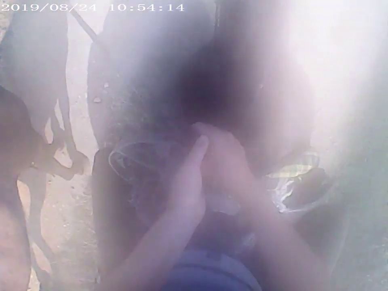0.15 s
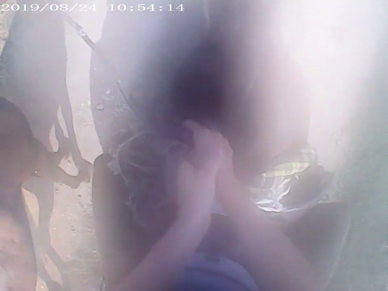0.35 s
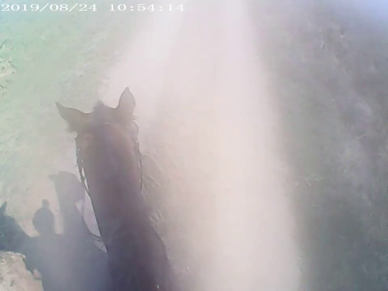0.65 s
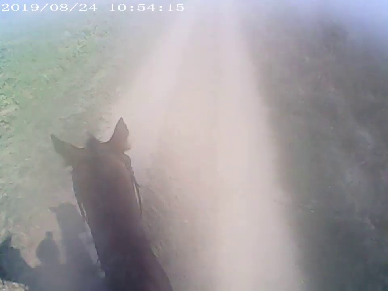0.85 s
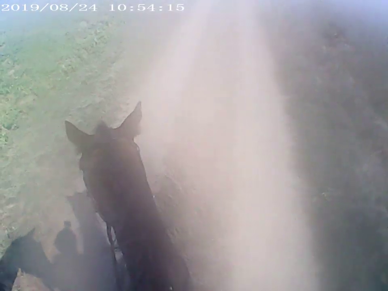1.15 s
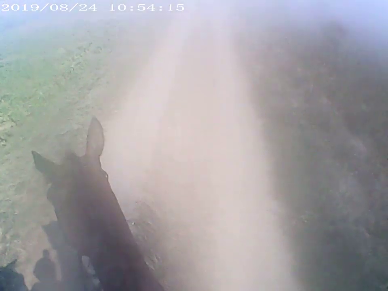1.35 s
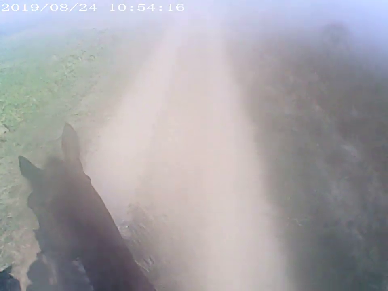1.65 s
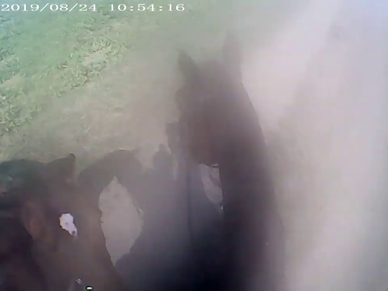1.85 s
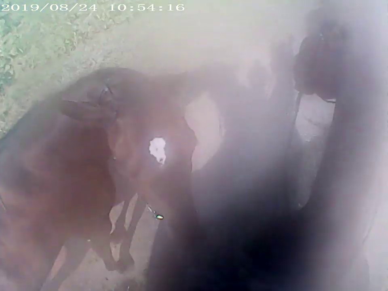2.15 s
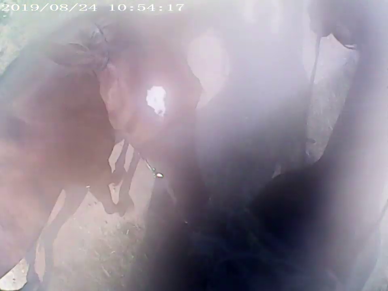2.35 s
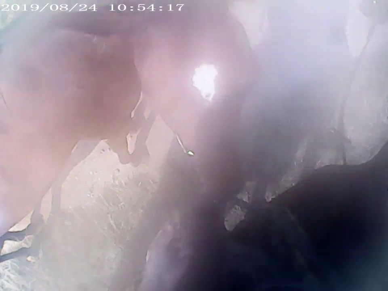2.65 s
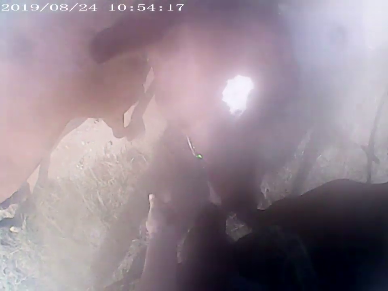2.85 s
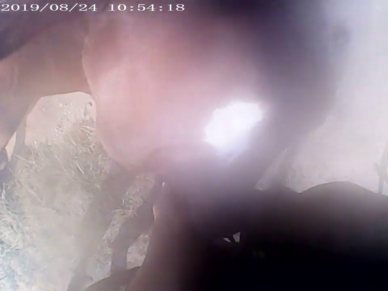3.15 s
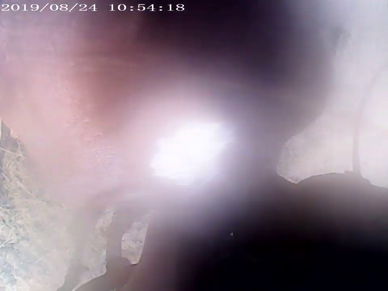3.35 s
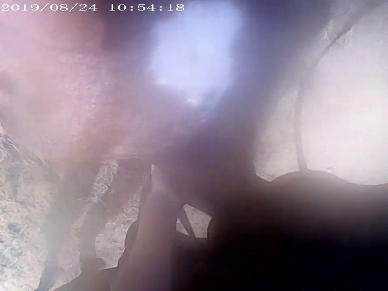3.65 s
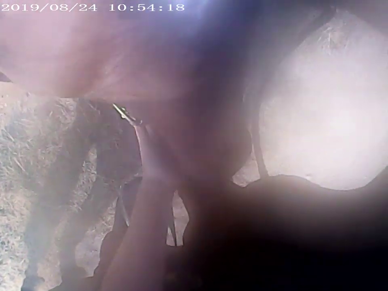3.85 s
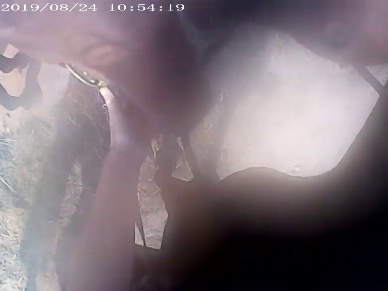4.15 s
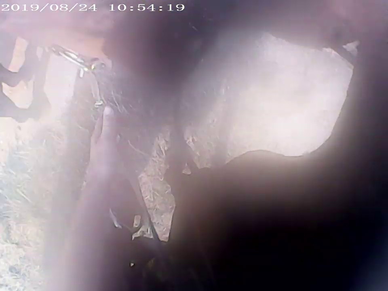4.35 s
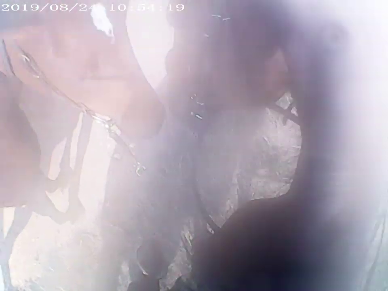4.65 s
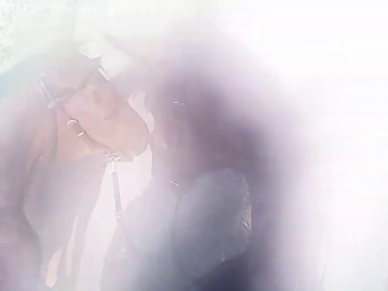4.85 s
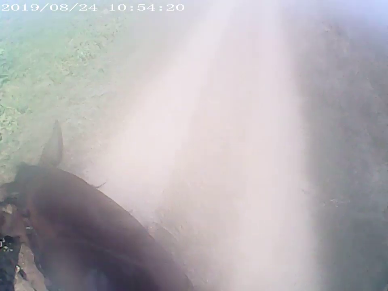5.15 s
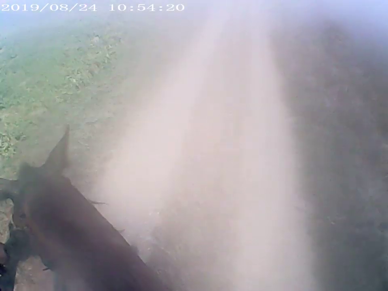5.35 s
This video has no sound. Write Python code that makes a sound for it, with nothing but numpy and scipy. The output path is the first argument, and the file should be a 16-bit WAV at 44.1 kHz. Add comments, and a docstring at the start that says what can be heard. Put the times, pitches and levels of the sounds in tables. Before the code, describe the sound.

Close, irregular handling noise outdoors: soft thumps, hard plastic ticks and grainy strap rubs, densest midway, with a dull rumble and thin hiss.

```python
"""A short rub and a low rumble come first, then a hollow tick and two soft thumps, close on the microphone.
Place: a dirt track, on a trotting horse; the microphone sits in a small camera worn by the rider.
Soft jolts push the membrane, hard contacts ring the plastic shell, and straps stroke it with grainy noise
that rubs, creaks and sizzles. Air rumbles at the port, and the recorder hisses below its narrow band limit."""
import sys
import numpy as np
from scipy import signal
from scipy.fft import rfft, irfft, next_fast_len
from scipy.io import wavfile
from scipy.ndimage import map_coordinates

SR = 44100
rng = np.random.default_rng(int(sys.argv[2]) if len(sys.argv) > 2 else 0)


def materialize(psi):
    """Save the field psi as 16-bit PCM at rate SR to the path in sys.argv[1].

    A 1-D psi becomes a single channel; in a 2-D psi each row is a channel.
    """
    bounded = np.clip(np.atleast_2d(psi).T, -1, 1)
    quanta = np.round(bounded * 32767).astype(np.int16)
    wavfile.write(sys.argv[1], SR, quanta)


N = 242991  # samples, about 5.5 s


def amp(db):
    """Gain of a level in dB."""
    return 10 ** (np.asarray(db) / 20)


def unit(x):
    """x scaled to rms 1."""
    return x / np.sqrt(np.mean(x ** 2) + 1e-20)


def wobble(rate):
    """A smooth random curve with rate knots a second."""
    knots = rng.standard_normal(int(N * rate / SR) + 4)
    return map_coordinates(knots, [np.arange(N) * rate / SR])


def filtered(x, response):
    """x through a filter given as gain against frequency in Hz."""
    size = next_fast_len(N + 8192)
    gain = response(np.fft.rfftfreq(size, 1 / SR))
    return irfft(rfft(x, size) * gain, size)[..., :N]


def coloured(x, spectrum):
    """x shaped by (Hz, dB) points joined on a log frequency axis, then set to rms 1."""
    points_hz, points_db = np.transpose(spectrum)

    def response(hz):
        return amp(np.interp(np.log(hz + 1), np.log(points_hz), points_db))

    return unit(filtered(x, response))


def grainy(spike_db, lump_db, rate):
    """Noise whose single samples and short lumps differ widely in size."""
    spikes = amp(spike_db * np.minimum(rng.exponential(size=N), 6))
    return rng.standard_normal(N) * spikes * amp(lump_db * wobble(rate))


# Straps moving over the shell, against the microphone.
# Each row: start in seconds, length in ms, rubbing level in dB, rumble level in dB.
STRAP_STROKES = [(0, 34.5, -37, -33), (0.049, 10, -40, -34), (0.204, 51, -44.5, -46.5),
                 (0.277, 72, -51.5, -46), (0.417, 23, -53, -61), (0.593, 40, -43, -41.5),
                 (0.695, 34, -46.5, -50), (0.837, 15, -47, -46.5), (0.917, 70, -45.5, -44),
                 (1.005, 42, -56, -41), (1.073, 53, -49.5, -50), (1.245, 70, -58, -61.5),
                 (1.326, 36.4, -40, -46), (1.414, 31, -41, -35.5), (1.453, 32, -50.5, -43),
                 (1.596, 58, -50, -45), (1.649, 24.8, -31, -31.5), (1.7, 130, -47, -41.5),
                 (1.811, 39, -35, -32.5), (1.936, 29, -46, -33), (1.994, 27, -42.5, -35),
                 (2.066, 23.5, -33.5, -30), (2.124, 40, -36, -40), (2.171, 17, -34, -29.5),
                 (2.258, 44, -48, -39.5), (2.362, 16.5, -29, -21), (2.39, 30, -54.5, -46),
                 (2.494, 118, -44, -46.5), (2.6, 21, -41.5, -41.5), (2.779, 27.5, -35.5, -36.5),
                 (2.827, 14, -29.5, -48.5), (2.859, 54, -40, -32.5), (3.02, 23, -51.5, -44),
                 (3.065, 56, -38, -32), (3.229, 41.5, -33.5, -32), (3.299, 24, -33.5, -37),
                 (3.34, 90, -58.5, -51.5), (3.478, 26, -42, -46), (3.506, 22.3, -24, -23),
                 (3.548, 57, -34, -31.5), (3.616, 26.7, -31.5, -30), (3.691, 35, -50.5, -46),
                 (3.743, 46, -39.5, -34), (3.799, 45, -49.5, -43.5), (4.119, 28.6, -39, -47.5),
                 (4.177, 22, -48.5, -35.5), (4.218, 21, -41, -57), (4.286, 59, -55.5, -57.5),
                 (4.358, 32, -48, -39), (4.438, 44, -37.5, -40), (4.612, 45, -46, -42),
                 (4.668, 13.3, -32, -36), (4.831, 42, -40.5, -35.5), (4.889, 42, -38.5, -40),
                 (4.955, 29.5, -43.5, -39), (5.128, 30.5, -34.5, -30), (5.277, 37, -46, -40.5),
                 (5.451, 31, -56, -50)]
# The gear at rest, under all strokes. Columns: rubbing, sizzle and rumble, each a level in dB.
RESTING_LEVELS = [-53, -70, -52]
SIZZLE_DB, SIZZLE_GROWS = -57, 1  # sizzle of a stroke that rubs at -39 dB; dB gained per dB of rubbing


def strokes():
    """Motion as gains of rubbing, sizzle and rumble: each strap stroke swells over a floor that is never still."""
    t = np.arange(N) / SR
    gains = amp(RESTING_LEVELS)[:, None] * amp(3 * wobble(9))
    for start, ms, rub_db, rumble_db in STRAP_STROKES:
        u = (t - start) * 2000 / ms - 1  # -1 at the start of the stroke, 1 at its end
        edge = np.where(u < 0, 6, 3.5)  # starts abruptly and trails off
        quick = 1 / (1 + np.abs(u) ** edge)
        slow = 1 / (1 + np.abs(u / 1.24) ** 3)  # the rumble spreads a little further
        sizzle_db = SIZZLE_DB + SIZZLE_GROWS * (rub_db + 39)
        levels_db = [rub_db, sizzle_db, rumble_db]
        gains = gains + amp(levels_db)[:, None] * [quick, quick, slow]
    return gains


# Spectra of air at the port, of rubbing in the shell's resonances and of the thin sizzle.
# Each row: frequency in Hz, relative density in dB per Hz.
PORT_RUMBLE = [(12, -25), (30, 4), (70, -1.5), (200, -5), (400, -12), (900, -45), (2000, -68.5)]
SHELL_RUBBING = [(200, -18.5), (500, 3.5), (850, -5.5), (1080, -2.5), (1200, 0), (1350, -2.5), (1650, -12),
                 (2100, -12), (3000, -33), (5000, -46)]
STRAP_SIZZLE = [(1500, -32.5), (2700, 5.5), (3300, -7.5), (3700, 2.5), (4250, 3), (4800, -8.5),
                (7000, -20.5)]


def shaking(gains):
    """Motion drives grainy rubbing in the shell's resonances, a thin sizzle and a lumpy rumble at the port."""
    creak = amp(2.0 * wobble(70))  # stick and slip, shared by rubbing and sizzle
    rub = coloured(creak * grainy(spike_db=3.5, lump_db=3.5, rate=200), SHELL_RUBBING)
    sizzle = coloured(creak * grainy(spike_db=3, lump_db=3, rate=120), STRAP_SIZZLE)
    rumble = coloured(grainy(spike_db=3.0, lump_db=5.5, rate=35), PORT_RUMBLE)
    return np.sum(gains * [rub, sizzle, rumble], axis=0)


def by_chance(gain, over_db, ms, count):
    """Rows (s, dB, ms, 0-1) at random moments, their level following the motion just then."""
    when, size, span, kind = rng.random((count, 4)).T
    motion_db = 20 * np.log10(gain[(when * N).astype(int)])
    level_db = motion_db + over_db + 10 * np.log10(size)
    length_ms = ms * 3 ** (2 * span - 1)  # a third to three times the usual
    return zip(when * N / SR, level_db, length_ms, kind)


# Clearest hard contacts on the shell. Each row: start in seconds, length in ms, level in dB,
# hardness (0 hollow, 1 snap, 2 bright; unitless).
HARD_CONTACTS = [(0.0203, 4, -31.5, 0), (0.2889, 0.95, -21.5, 0.53), (0.351, 0.75, -26.5, 0.44),
                 (0.6957, 5.5, -40.5, 0.84), (0.7527, 2, -38, 0.3), (0.8481, 6.5, -28.5, 1.22),
                 (0.9034, 1.4, -48, 2), (1.0127, 3.2, -30.5, 0.36), (1.089, 5.8, -30, 1.15),
                 (1.3343, 3.4, -33, 0.87), (1.4137, 13.5, -34, 1.04), (1.4686, .97, -23, 0.62),
                 (1.6074, 1.9, -31.5, 2.3), (1.649, 5.1, -33, 1.4), (1.66, 1.9, -21.5, 1.2),
                 (1.7545, .93, -24, 0), (1.8353, 2.9, -29, 1.5), (1.943, 1.4, -37, 2.34),
                 (2.0756, 2.6, -30, -0.3), (2.119, 7.3, -29.5, 0.9), (2.1544, 0.49, -16.5, 0.23),
                 (2.1693, 6.9, -41.5, 1.8), (2.1835, 3.4, -22, 1.35), (2.195, 1.4, -25, 1.25),
                 (2.2262, 1.5, -27, 0.45), (2.3039, 9.9, -43.5, 2), (2.341, 12, -38.5, 0.5),
                 (2.3728, 5.8, -31.5, 1.83), (2.3775, 1, -28.5, 0.84), (2.4985, 3.4, -26, 0.3),
                 (2.57, 1, -31, 1.5), (2.5822, 2.1, -37, 0.7), (2.61, 3.5, -36, 0.9),
                 (2.6238, 4.1, -29, 0.74), (2.762, 5.8, -33.5, 0), (2.8305, 1.7, -21.5, 0.37),
                 (2.8721, 4.9, -31, -0.1), (2.8896, 2, -22, 1.04), (2.9043, 9.3, -28, 1.2),
                 (3.034, 6.3, -45.5, 2.5), (3.0899, 3.4, -36.5, 2.4), (3.222, 0.83, -28.5, 0.67),
                 (3.26, 7.8, -31, 1.84), (3.2693, 3.8, -26.5, 1), (3.285, 0.64, -27.5, 0.3),
                 (3.3091, 1.2, -30, -3.5), (3.315, 4.6, -33, 1.5), (3.5171, 3.1, -3, 1.34),
                 (3.518, 9.1, -23, -0.8), (3.541, .5, -30, 1.6), (3.545, 5.7, -25.5, 0.7),
                 (3.571, 6.3, -25, 1.1), (3.582, 12, -31, 2.5), (3.5897, 1.5, -16.5, 1.5),
                 (3.5957, 4.8, -26.5, 1), (3.603, 1.8, -36, 0.8), (3.6118, 11, -30, 1.2),
                 (3.6281, 2.8, -27.5, 1.6), (3.639, 2.3, -36, 1.6), (3.7035, 6.5, -35.5, 1.2),
                 (3.7467, 2.4, -19, 0.73), (4.292, 2.7, -36.5, 0.4), (4.3697, 2.2, -37, 2),
                 (4.3756, 1.9, -32.5, 1.5), (4.3838, 1.4, -36, 2.1), (4.672, 1.7, -22, 1.25),
                 (4.7677, 4.2, -38.5, 0), (4.894, 7.4, -25, 0.54), (4.9383, 4.7, -31, 0.27),
                 (4.9548, 4.9, -46, 2.5), (4.9704, 1.5, -25.5, 1.24), (5.1036, 1.8, -37.5, 1.5),
                 (5.1086, 0.79, -20, 0.87), (5.132, 0.76, -20.5, 1.2), (5.142, 1.33, -15, 1.35),
                 (5.2136, 3.7, -33, 0.38)]
# Modes of the shell, nominal. Each row: frequency in Hz, relative level in dB, 60 dB decay time in s.
HOLLOW_MODES = [(1210, 6, 0.016), (520, 2, 0.013), (800, -1, 0.015)]
SNAP_MODES = [(1830, 17, 0.0035), (2300, -8, .006)]
BRIGHT_MODES = [(3380, -3, 0.0073), (3726, 3.5, 0.017), (4340, 9, 0.0037), (5800, -6, 0.0051),
                (6660, -9, 0.0062)]
# Time scale of the contact felt by each mode group. Columns: hollow, snap and bright, in ms.
CONTACT_MS = [0.14, 0.094, 0.01]
# Loss of a mode group one step of hardness away. Columns: hollow, snap and bright, in dB.
GROUP_LOSS_DB = np.array([12.5, 14, 19])
SMALL_TICK_DB, SMALL_TICK_MS = -3.5, 2.3  # chance ticks: highest level over the rubbing, usual length


def ringing(modes, attack_ms, t):
    """Decaying shell modes, slightly detuned for each contact and softened by its bluntness."""
    spread = rng.normal(size=(len(modes), 2)) * [4, .015]  # dB, fraction of the frequency
    ring = 0
    for (hz, level_db, t60), (extra_db, detune) in zip(modes, spread):
        decay = amp(level_db + extra_db - 60 * t / t60)
        ring = ring + decay * np.sin(2 * np.pi * hz * (1 + detune) * t)
    contact = np.exp(-(t[:40] * 1000 / attack_ms - 2) ** 2)  # a blunt contact leaves out the treble
    return np.convolve(ring, contact)[:len(t)]


def ticks(rubbing):
    """A hard first touch and a few chattering contacts ring three groups of shell modes; harder rings higher."""
    out, t = np.zeros(N + SR), np.arange(1500) / SR
    chance = by_chance(rubbing, SMALL_TICK_DB, SMALL_TICK_MS, count=240)
    small = [(s, ms, db, 2 * kind) for s, db, ms, kind in chance]
    for s, ms, level_db, hardness in HARD_CONTACTS + small:
        chatter = rng.standard_normal(len(t)) * (rng.random(len(t)) < .12)
        force = chatter * np.exp(-t * 1800 / ms)
        force[0] = 4  # the first touch
        levels_db = level_db - GROUP_LOSS_DB * (hardness - np.arange(3)) ** 2
        groups = (HOLLOW_MODES, SNAP_MODES, BRIGHT_MODES)
        for modes, db, attack_ms in zip(groups, levels_db, CONTACT_MS):
            hit = signal.fftconvolve(force, ringing(modes, attack_ms, t))[:len(t)]
            energy = ms * SR / 1000  # that of a level held for the length of the contact
            out[round(s * SR):][:len(t)] += amp(db) * hit * np.sqrt(energy / np.sum(hit ** 2))
    return out[:N]


# Strongest soft jolts, right on the microphone.
# Each row: moment of the peak in seconds, approximate peak in dB, width setting in ms.
SOFT_JOLTS = [(0.0554, -16, 2.5), (0.0618, -16.5, 1.2), (0.2149, -15.5, 2.4), (0.3386, -24.5, 9.4),
              (0.8492, -16, 1.06), (1.0118, -22, 5.4), (1.6085, -19.5, 1.54), (1.659, -1.5, 1.58),
              (1.6757, -22.5, 2.5), (1.8045, -19.5, 4.1), (1.8356, -19.5, 3.5), (1.9459, -13.5, 3.05),
              (2.0851, -12, 2), (2.092, -22, 17), (2.1863, -4, 2.25), (2.1955, -11, 1.9),
              (2.3668, -22.5, 6.9), (2.3738, -5, 1.76), (2.5317, -20.5, 3), (2.569, -20, 1.5),
              (2.6124, -19, 2.8), (2.792, -18, 1.63), (2.7991, -14.5, 2), (2.8074, -18, 4.4),
              (2.9039, -8, 1.7), (3.2318, -20, 5), (3.2613, -18, 11.4), (3.302, -21, 2.2),
              (3.3079, -13, 1.26), (3.3152, -15, 1.7), (3.521, -5, 2.2), (3.5418, -27, 5.3),
              (3.5848, -18, 8.3), (3.6204, -17.5, 0.97), (3.634, -7.5, 2.55), (3.7646, -16.5, 1.34),
              (3.8025, -19.5, 3.5), (4.3718, -18.5, 1.7), (4.4397, -18.5, 1.64), (4.6771, -14.5, 1.18),
              (4.6858, -16, 3.6), (4.874, -22.5, 8.3), (4.9679, -15.5, 2.86), (5.1324, -10, 2.7),
              (5.1588, -23, 5.1), (5.3295, -23, 2.25)]
SMALL_JOLT_DB, SMALL_JOLT_MS = 6, 3.8  # chance jolts: highest peak over the rumble, usual width setting


def jolts(rumble):
    """Each jolt presses the membrane fast and lets go slowly; the vent evens the pressure out around it."""
    out, t = np.zeros(N + SR), np.arange(-2000, 2000) / SR
    small = [row[:3] for row in by_chance(rumble, SMALL_JOLT_DB, SMALL_JOLT_MS, count=150)]
    for s, db, ms in SOFT_JOLTS + small:
        u = t * 2000 / ms
        press, release = np.exp(-(u / 0.55) ** 2), np.exp(-np.abs(u / 1.6) ** 1.65)
        push = np.where(u < 0, press, release)
        vent = np.exp(-(u / 3.03) ** 2)
        balanced = push - vent * push.sum() / vent.sum()
        out[round(s * SR):][:len(t)] += amp(db + 3.5) * balanced  # 3.5 dB about makes up for the vent
    return out[2000:][:N]


def scene():
    """Everything reaches one microphone through the shell."""
    gains = strokes()
    rubbing, _, rumble = gains
    return (jolts(rumble) + ticks(rubbing) + shaking(gains))[None]


# Hiss of the recorder. Each row: frequency in Hz, relative density in dB per Hz.
RECORDER_HISS = [(20, 6.5), (300, 1.5), (1200, -23), (1800, 8), (3000, 4.5), (6400, 4), (7200, -5),
                 (7600, -45.5)]
HISS_DB, TOP_HZ = -60, 7700  # rms of the hiss before the band limit; start of the deep cut


def record(dry):
    """The recorder adds its hiss, rounds off the highest peaks and rolls off steeply to its band limit."""
    x = dry + amp(HISS_DB) * coloured(rng.standard_normal(N), RECORDER_HISS)
    x = x / (1 + np.abs(x / .8) ** 4) ** (1 / 4)
    x = filtered(x, lambda hz: 1 / (1 + (hz / 7250) ** 40))
    x = filtered(x, lambda hz: np.where(hz < TOP_HZ, 1, amp(-45)))
    return x + amp(-99) * rng.standard_normal(N)  # a faint noise over the full band


dry = scene()
out = record(dry)
materialize(out)
```